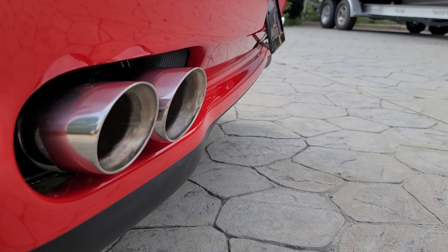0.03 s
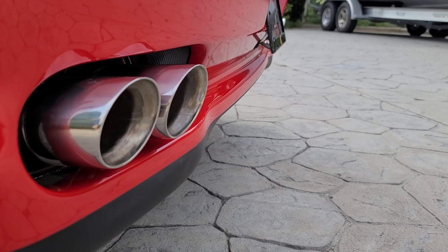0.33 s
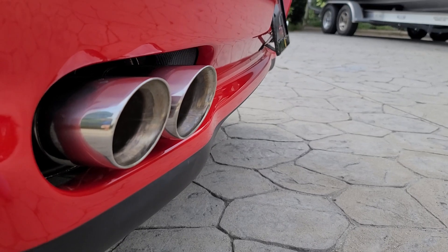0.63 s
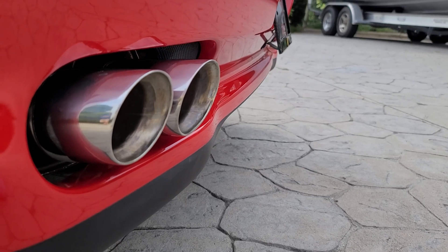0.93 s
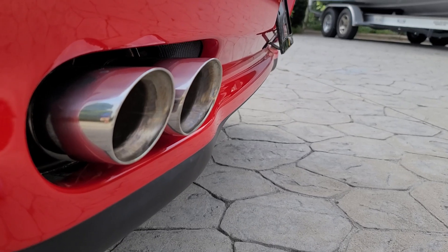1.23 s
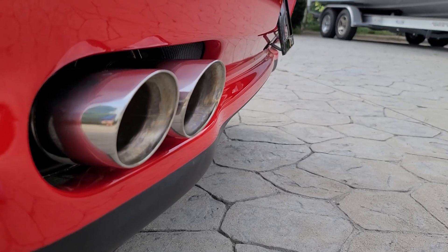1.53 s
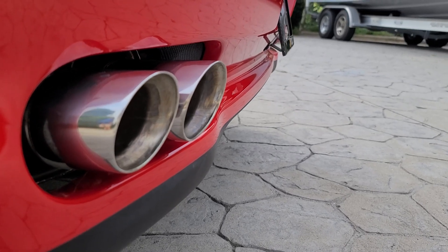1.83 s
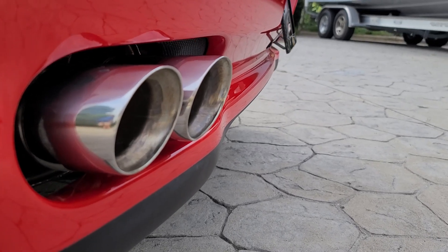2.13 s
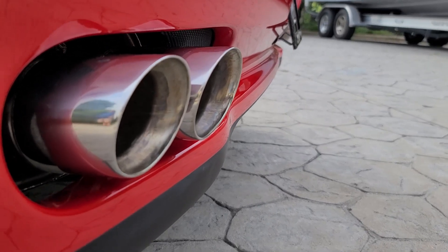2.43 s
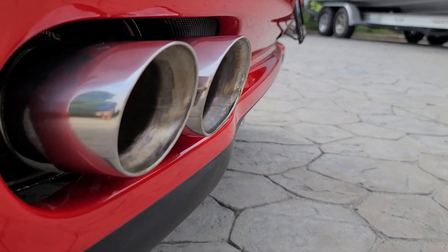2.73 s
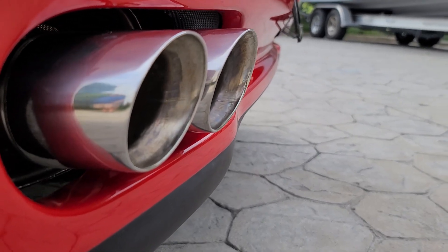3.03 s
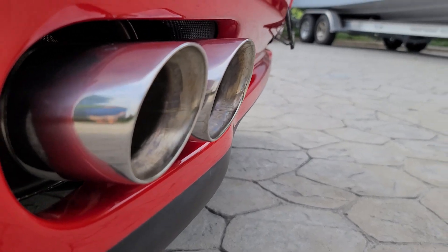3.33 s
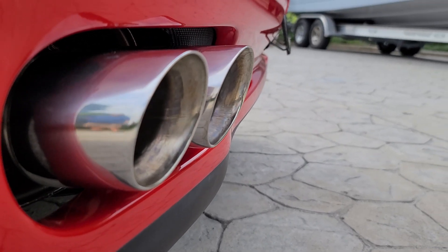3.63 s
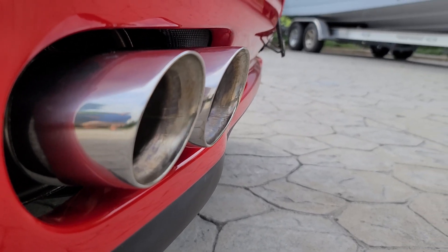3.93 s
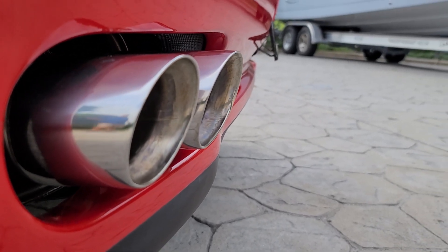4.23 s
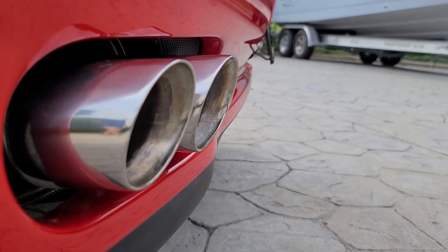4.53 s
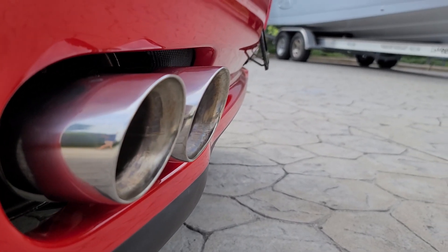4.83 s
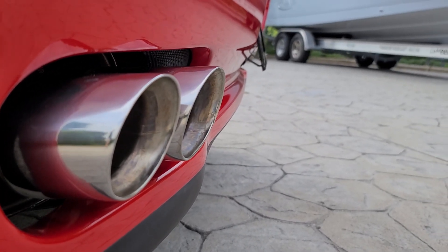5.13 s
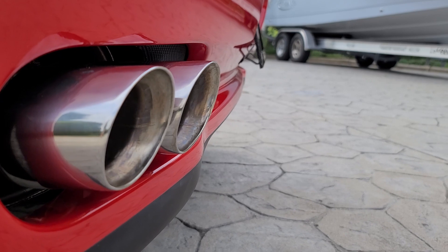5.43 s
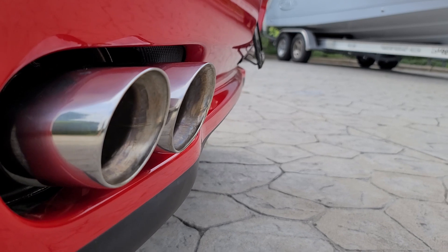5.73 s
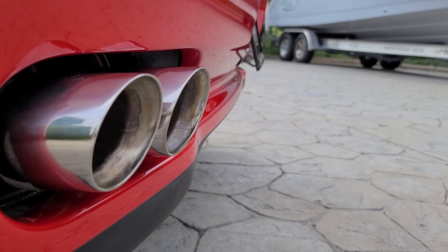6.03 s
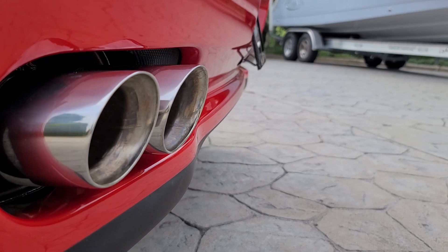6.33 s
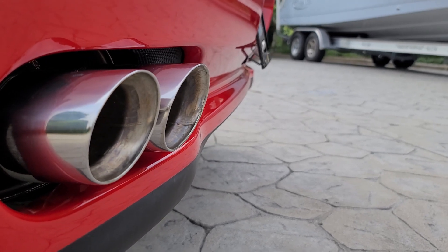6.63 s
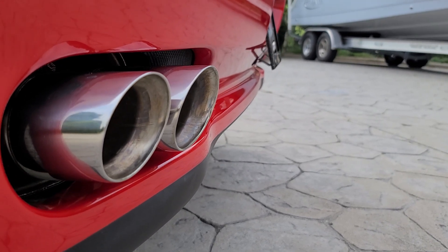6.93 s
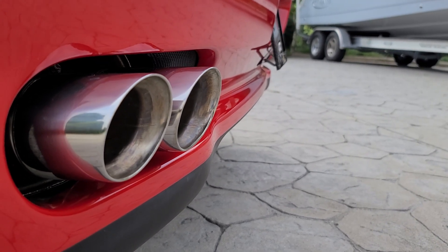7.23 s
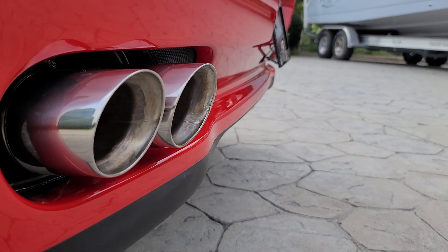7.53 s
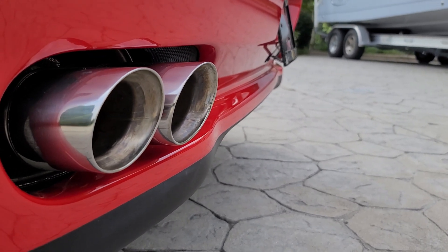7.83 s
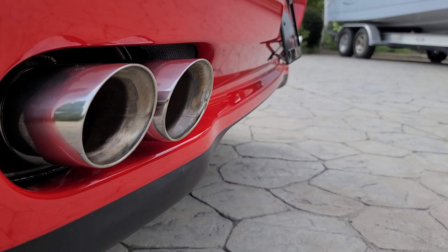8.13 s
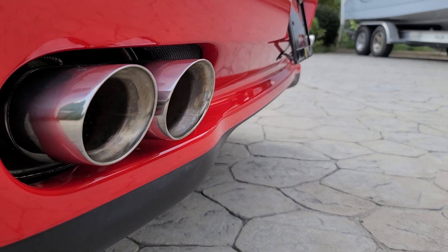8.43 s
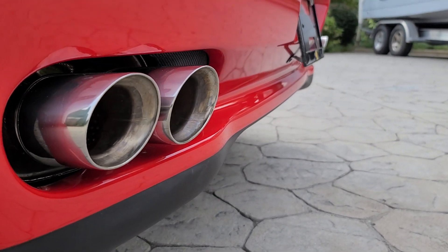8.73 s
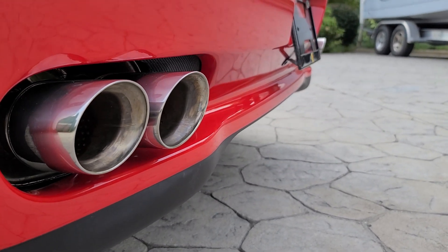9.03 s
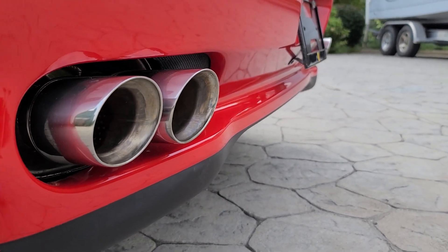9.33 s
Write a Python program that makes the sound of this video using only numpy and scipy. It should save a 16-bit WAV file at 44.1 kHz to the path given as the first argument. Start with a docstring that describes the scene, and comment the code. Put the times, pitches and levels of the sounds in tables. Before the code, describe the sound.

A sports car cold-starts outdoors, heard very close to its tailpipes. The starter engages with a metallic clash and grinds for about a second over low, uneven puffs. The engine catches with sharp cracks, flares up, then sinks with a few faint pops to a deep, steady idle with a raspy exhaust edge. A thin, faint pump whistle sits above it.

```python
"""Sports car cold start

A six-cylinder car on an open driveway, heard a hand's width from one pair of tailpipes. The starter grinds
and surges after each compression while the cylinders puff into the muffler. The engine catches with sharp
cracks, flares and sinks to idle. Each firing pumps the muffler, thumps and barks down the pipe and blows
gas, the near bank harder than the far one. A pump whistles thinly over a quiet outdoor rumble."""
import sys
import numpy as np
from scipy import signal
from scipy.fft import rfft, irfft
from scipy.io import wavfile
from scipy.ndimage import uniform_filter1d

SR = 44100
rng = np.random.default_rng(int(sys.argv[2]) if len(sys.argv) > 2 else 0)


def inscribe(sig):
    """Save sig as 16-bit PCM at rate SR to the path in sys.argv[1].

    A 1-D sig is mono; a 2-D sig holds one channel per row.
    Samples are clipped to [-1, 1] before scaling.
    """
    pcm = np.round(np.clip(np.atleast_2d(sig).T, -1, 1) * 32767)
    wavfile.write(sys.argv[1], SR, pcm.astype(np.int16))


N = 418509
T = np.arange(N) / SR

# engine speed through catch, flare and idle: (time [s], firing rate [Hz])
ENGINE_SPEED = [(1.134, 13.53), (1.33, 56.87), (1.49, 76.15), (1.73, 89.0), (1.97, 88.42), (2.24, 75.25),
                (2.58, 63.8), (2.9, 59.4), (3.37, 62.42), (3.83, 61.34), (4.19, 56.71), (4.64, 61.27),
                (5.15, 60.09), (6.08, 61.24), (6.79, 60.4), (7.84, 61.85), (9.49, 60.98)]
# how hard the engine pulls, which makes the gas turbulent: (time [s], load [0-1])
ENGINE_LOAD = [(1.15, 0.9), (1.24, 1), (1.49, 0.74), (1.6, 0.33), (1.85, 0), (2.2, 0)]
# compressions while cranking: (time [s], speed surge [share], puff level [dB], puff t60 [s])
COMPRESSIONS = [(.205, 0, -11, .15), (.255, 0.18, -15, 0.2), (0.367, 0.022, -2, 0.6),
                (0.489, .15, 0, 0.091), (.578, .06, 3, 0.21), (.668, 0.17, -21, 0.26),
                (.75, 0.081, -11, 0.41), (.838, .17, -26, .1), (.912, 0.049, -5, 0.23),
                (.995, .1, -17, 0.45), (1.067, 0, -8, 0.86)]
# cross resonances of the tailpipe: (frequency [Hz], width [Hz], gain [dB])
TAILPIPE_MODES = [(1062, 45, 8.5), (1355, 40, 6.5), (1736, 70, 2.5), (2204, 70, 1.5)]
# resonances of the starter housing: (frequency [Hz], width [Hz], gain [dB])
HOUSING_MODES = [(595, 17, -2), (931, 66, 1.5), (1328, 30, 1), (1692, 17, 4), (2040, 59, -3.5),
                 (2210, 23, -3.5), (2553, 87, -11.5), (2660, 38, -6.5), (3250, 94, -41)]
# bright hiss of the exhaust jet: (frequency [Hz], gain [dB])
HISS_EQ = [(1500, -24.5), (3300, -5), (4200, -6), (5400, -1), (6300, -3.5), (7500, -7), (10000, -12),
           (12500, -3.5), (15000, -1)]
# sizzling top end of the starter: (frequency [Hz], gain [dB])
SIZZLE_EQ = [(2350, -20), (4000, -11), (4560, -3), (5560, -2), (6850, -7.5), (11200, -9.5), (15500, -13.5)]

STARTER_ON_S, STARTER_OFF_S = 0.172, 1.042
MERGE_S = 1.335  # from here the firings merge into one steady boom
WARM_FROM_S, WARM_BY_S = 4.94, 8.3


def undb(db):
    """Decibels to gain."""
    return np.exp(np.asarray(db) * np.log(10) / 20)


def curves(table, at=T):
    """The columns of a table, interpolated along its first one."""
    axis, *columns = np.transpose(table)
    return [np.interp(at, axis, column) for column in columns]


def ramp(start, end):
    """Fade from 0 to 1 between two times."""
    return np.interp(T, [start, end], [0, 1])


def unit(x):
    """Scale to rms 1."""
    return x / np.sqrt(np.mean(x ** 2))


def colour(x, points, size=4096):
    """Minimum-phase EQ through (frequency [Hz], gain [dB]) points."""
    hz, db = np.transpose(points)
    bin_hz = np.arange(size // 2 + 1) * SR / size + 1
    log_gain = np.log(undb(np.interp(np.log(bin_hz), np.log(hz), db)))
    cepstrum = irfft(log_gain)
    cepstrum[1:size // 2] *= 2
    cepstrum[size // 2 + 1:] = 0
    response = irfft(np.exp(rfft(cepstrum)))
    return signal.oaconvolve(np.atleast_2d(x), response[None], axes=1)[:, :N]


def resonate(x, modes):
    """Parallel resonators: (frequency [Hz], width [Hz], gain [dB])."""
    return sum(undb(db) * signal.lfilter(*signal.iirpeak(hz, hz / width, fs=SR), x)
               for hz, width, db in modes)


def wander(rate_hz):
    """Smooth random modulation, rms 1."""
    hold = int(SR / rate_hz)
    steps = np.repeat(rng.standard_normal(N // hold + 1), hold)
    return unit(uniform_filter1d(steps, hold)[:N])


def stereo(x, lag_ms):
    """Sound reaches the left microphone first."""
    x = np.ravel(x)
    return np.array([x, np.interp(T - lag_ms / 1000, T, x)])


def turbulence(shared, lag_ms):
    """White noise with a share of its power common to both microphones."""
    common = stereo(rng.standard_normal(N), lag_ms)
    return np.sqrt(shared) * common + np.sqrt(1 - shared) * rng.standard_normal((2, N))


def strikes(times, sizes):
    """One impulse for each time."""
    return np.bincount(np.clip(times * SR, 0, N - 1).astype(int), sizes, N)


def swell(impulses, peak_s):
    """Each impulse becomes an envelope that peaks after peak_s and dies away."""
    age = np.arange(SR // 8) / SR / peak_s
    return signal.oaconvolve(impulses, age * np.exp(1 - age))[:N]


def firings():
    """Firing rate, running count of firings, the sample of each one and its bank (1 = far)."""
    hz, = curves(ENGINE_SPEED)
    phase = np.cumsum(hz * (T >= ENGINE_SPEED[0][0])) / SR
    number = np.arange(int(phase[-1]))
    return hz, phase, np.searchsorted(phase, number, side="right"), number % 2


def engine(thump_delay_s=0.001, gas_lead_s=0.00029, far_delay_s=0.00068):
    """The two banks fire in turn; speed, load and pipe warmth ride the level of every exhaust layer."""
    # base exhaust mix: (firing rate [Hz], boom [dB], thump [dB], bark [dB], rasp [dB], hiss [dB])
    mix_by_speed = [(59, -13.5, -18, -29.5, -41, -55.5), (59.35, -11, -17.5, -30.5, -40, -53.5),
                    (62.6, -11, -18.5, -26, -44, -53.5), (65.6, -13, -15, -25, -43, -57),
                    (76.2, -11, -27, -28, -40.5, -56), (88.7, -8, -24, -29, -36.5, -51)]
    # added at full load: (boom [dB], thump [dB], bark [dB], rasp [dB], hiss [dB])
    load_boost = (.5, 5.5, 7.8, 10, 12)
    # added by a warm pipe: (boom [dB], thump [dB], bark [dB], rasp [dB], hiss [dB])
    warm_boost = (-0.9, 2.5, -1, 4.5, 4.5)
    # strength of each cylinder in firing order, near bank first: (gain [dB])
    cylinder_db = [1.4, -1.2, -1.4, -0.65, 0.46, -0.13]
    # the far bank's thump against the near bank's: (time [s], gain [dB])
    far_thump = [(1.1, -5.5), (1.6, -11), (2.1, 1), (2.45, -12.5), (3, -20.5), (9.4, -10)]
    # turbulent flow through the muffler: (frequency [Hz], gain [dB])
    flow_eq = [(20, -18), (45, -9.5), (72, 1), (100, -9), (150, -11.5), (240, -9.5), (400, -29.5),
               (900, -56)]
    hz, phase, at, far = firings()
    far_db, = curves(far_thump)
    load, = curves(ENGINE_LOAD)
    warmth = ramp(WARM_FROM_S, WARM_BY_S)
    catch_s = ENGINE_SPEED[0][0]
    build_db = -20.5 * (1 - ramp(catch_s, catch_s + 0.11))  # the first firings are weak
    boom_db, thump_db, bark_db, rasp_db, hiss_db = (
        db + load_db * load + warm_db * warmth + build_db
        for db, load_db, warm_db in zip(curves(mix_by_speed, hz), load_boost, warm_boost))
    # cold combustion is uneven
    thump_jitter, burn_jitter, gust_jitter = rng.standard_normal((len(at), 3)).T
    per_firing = np.sqrt(np.mean(hz[at]) / hz[at])  # holds the power steady as firings crowd together
    thump_sizes = per_firing * undb(far * far_db[at] + 0.5 * thump_jitter)
    burn = per_firing * undb(np.resize(cylinder_db, len(at)) + 1.7 * np.tanh(burn_jitter))
    gusts = burn * undb(1.8 * np.tanh(gust_jitter))

    boom = -np.sqrt(2) * np.cos(2 * np.pi * phase) * ramp(MERGE_S - 0.025, MERGE_S + 0.025)
    flow = unit(colour(rng.standard_normal(N), flow_eq)) * undb(-20.5 + 18.8 * load)
    thump = pipe_thump(strikes(T[at] + thump_delay_s, thump_sizes))
    lows = (boom + flow) * undb(boom_db) + thump * undb(thump_db)
    exit_s = T[at] - gas_lead_s + far * far_delay_s  # the far bank's gas has further to go
    gas = swell(strikes(exit_s, gusts * undb(-4.5 * far)), peak_s=0.0022)
    highs = gas_rasp(gas) * undb(rasp_db - 0.5) + jet_hiss(exit_s, gusts, far) * undb(hiss_db)
    mids = pipe_bark(strikes(exit_s, burn * undb(-3.5 * far)), gas, load) * undb(bark_db)
    return (T >= catch_s) * (stereo(lows, lag_ms=0.19) + mids + highs)


def pipe_thump(impulses, low_cut_hz=85, size=4096):
    """Each impulse becomes a rounded pressure hump; the open pipe end radiates little of its sub-bass."""
    # spectrum of one hump: (frequency [Hz], gain [dB])
    thump_eq = [(20, -16.5), (31, 12.5), (60, -5.5), (90, 10.5), (122, 4), (152, 2), (183, -4.5),
                (214, -2.5), (245, -10.5), (280, -15), (400, -45.5), (900, -68)]
    hz, db = np.transpose(thump_eq)
    gain = undb(np.interp(np.log(np.linspace(1, SR / 2, size + 1)), np.log(hz), db))
    hump = np.roll(irfft(gain), size)
    humps = signal.oaconvolve(impulses, hump)[size:size + N]
    return unit(signal.sosfilt(signal.butter(2, low_cut_hz, "high", fs=SR, output="sos"), humps))


def pipe_bark(fronts, gas, load, echo_s=0.00741):
    """Pressure fronts ring the pipe and bounce once off the muffler; hot gas brightens the tone."""
    # voice of the cold pipe: (frequency [Hz], gain [dB])
    cold_eq = [(120, -40.5), (260, -24.5), (315, 1), (350, 2.5), (420, 8), (490, 1), (550, 1), (630, -4.5),
               (760, -13.5), (950, -24.5), (1300, -22.5), (2000, -60), (5000, -69.5)]
    # voice of the warm pipe, its resonances higher: (frequency [Hz], gain [dB])
    warm_eq = [(120, -51), (265, -9.5), (305, 2), (335, -5), (425, 1), (490, 2), (560, 1), (700, -6),
               (830, -18.5), (980, -24.5), (1350, -19), (2200, -57.5), (5000, -66.5)]
    echoed = unit(fronts + 0.082 * np.interp(T - echo_s, T, fronts))
    breath = undb(-6.5 + 7 * load) * unit(rng.standard_normal(N) * (gas + 0.6))
    drive = (echoed + breath) / undb(2.8 * load)
    heat = 0.69 * (1 - ramp(2.4, 2.7)) + ramp(WARM_FROM_S, WARM_BY_S)  # the flare, then the slow warm-up
    body = (1 - heat) * unit(colour(drive, cold_eq)) + heat * unit(colour(drive, warm_eq))
    ring = undb(-27) * unit(resonate(drive, TAILPIPE_MODES))
    return stereo(body, lag_ms=0.22) + stereo(ring, lag_ms=0.31)


def gas_rasp(gas):
    """Each puff of gas rasps through the tailpipe and rings its cross resonances."""
    # midrange grit of the gas: (frequency [Hz], gain [dB])
    rasp_eq = [(410, -27.5), (700, -1.5), (777, -4.5), (896, -8), (952, -20.5), (1040, -10), (1140, -12),
               (1350, -12.5), (1550, -26), (1750, -10.5), (2040, -21), (2290, -23), (2740, -36),
               (3640, -49), (4200, -51), (5460, -68.5), (9240, -120)]
    rasp = colour(turbulence(0.85, lag_ms=0.3) * (gas + 0.23), rasp_eq)
    return unit(rasp) + undb(-11.5) * unit(resonate(rasp, TAILPIPE_MODES))


def jet_hiss(exit_s, gusts, far, tick_delay_s=0.002):
    """The exhaust jet hisses in pulses; the near bank's are louder and carry a sharp tick."""
    jet = swell(strikes(exit_s, gusts * undb(-13 * far)), peak_s=0.0034)
    tick = swell(strikes(exit_s + tick_delay_s, gusts * (1 - far)), peak_s=0.001)
    envelope = np.sqrt(0.6 * jet ** 2 + 0.81 * tick ** 2 + 0.14)
    return unit(colour(turbulence(0.24, lag_ms=0.4) * envelope, HISS_EQ))


def muffler_puffs(muffler_hz=67.8, catch_hz=71, catch_db=7.5, lead_s=0.0017, rise_s=0.0085):
    """Single charges of gas ring the muffler: one per cranking stroke, then per firing until they merge."""
    _, _, at, _ = firings()
    cranked = [(s, db, muffler_hz, t60) for s, _, db, t60 in COMPRESSIONS]
    fired = [(s - lead_s, catch_db, catch_hz, 2.9 * gap)
             for s, gap in zip(T[at], np.diff(T[at])) if s < MERGE_S]
    puffs = np.zeros(N)
    age = T[:SR // 2]
    attack = 1 - np.exp(-(age / rise_s) ** 2)
    for s, db, hz, t60 in cranked + fired:
        ring = -np.sin(2 * np.pi * hz * age) * attack * undb(-60 * age / t60)
        start = int(s * SR)
        puffs[start:start + len(age)] += undb(db) * ring
    # air pumped through the muffler rumbles between the puffs
    pumping = ramp(0.16, 0.27) * (1 - ramp(STARTER_OFF_S, MERGE_S))
    airflow = resonate(rng.standard_normal(N), [(muffler_hz, 24, 0)])
    rumble = unit(resonate(airflow, [(muffler_hz, 40, 0)])) * undb(-25.5)
    return stereo(puffs + pumping * rumble, lag_ms=0.1)


def exhaust_cracks(lean_from_s=1.502, lead_s=0.001, far_boost_db=1, spit_db_per_hz=0.33):
    """The first rich charges leave the pipe as steep fronts with a spit of treble; stray pops follow."""
    # stray pops after the catch: (time [s], body level [dB], spit level [dB])
    pops = [(1.52, -39, -49), (1.5445, -17.5, -29), (2.365, -32, -52), (2.48, -33, -46), (2.604, -33, -56)]
    # body of a crack: (frequency [Hz], gain [dB])
    crack_eq = [(300, -2.5), (800, 5), (1400, -3.5), (2800, -18.5), (4500, -24.5), (15000, -52)]
    hz, _, at, far = firings()
    load, = curves(ENGINE_LOAD)
    rich = T[at] < lean_from_s
    at, far = at[rich], far[rich]
    body_db = -19 + far_boost_db * far - 10 * (1 - load[at])
    spit_db = body_db - 2.5 + spit_db_per_hz * (hz[at] - hz[at[-1]])  # brighter as the revs climb
    cracks = np.transpose([T[at] - lead_s, body_db, spit_db])
    times, body_db, spit_db = np.vstack([cracks, pops]).T
    body = unit(colour(turbulence(0.38, lag_ms=0.27), crack_eq))
    body *= swell(strikes(times, undb(body_db)), peak_s=0.0019)
    spit = unit(colour(turbulence(0.28, lag_ms=0.258), HISS_EQ))
    spit *= swell(strikes(times, undb(spit_db)), peak_s=0.00061)
    return body + spit


def starter(bite_db=22, teeth_per_groan=3.72, inrush_s=0.035, release_s=0.062):
    """Gear teeth rattle the housing over a brush whirr and a low groan, surging after each compression."""
    # cranking speed: (time [s], gear tooth rate [Hz])
    cranking = [(.18, 830), (.28, 908.4), (.42, 830.6), (.55, 919), (.72, 962), (.96, 1057), (1.06, 1240)]
    # partials of the gear whine: (multiple of the tooth rate [ratio], level [dB])
    gear_partials = [(1, -5), (1.27, -10.5), (2.001, -1.5), (3, -11)]
    # whirr of the brushes: (frequency [Hz], gain [dB])
    whirr_eq = [(210, -74), (350, -46), (577, -2), (689, -9.5), (776, 5.5), (874, -5), (1180, -7),
                (1680, -1), (2130, -6), (2370, -24), (3350, -2), (4560, -27), (6000, -44.5), (7800, -52),
                (13200, -120)]
    # resonance of the starter's mount: (frequency [Hz], width [Hz], gain [dB])
    mount_modes = [(285, 49, 0)]
    times, surge_sizes, _, _ = np.transpose(COMPRESSIONS)
    surge = swell(strikes(times, surge_sizes), peak_s=0.018)
    tooth_hz = curves(cranking)[0] * (1 + surge) * (1 + 0.015 * wander(500))
    tooth_phase = 2 * np.pi * np.cumsum(tooth_hz) / SR
    mesh = sum(undb(db) * np.sin(ratio * tooth_phase) for ratio, db in gear_partials)
    gears = 1.2 * resonate(mesh, HOUSING_MODES) + 0.6 * mesh
    gears *= undb(-4 + bite_db * surge + 3 * wander(320))
    chatter = undb(1.2 * wander(260))
    housing = unit(resonate(turbulence(0.4, lag_ms=0.505) * chatter, HOUSING_MODES))
    whirr = unit(colour(turbulence(0.16, lag_ms=0.54) * chatter, whirr_eq))
    sizzle = unit(colour(turbulence(0.18, lag_ms=0.52) * chatter, SIZZLE_EQ)) * undb(-45)
    grind = (stereo(gears, lag_ms=0.1) + 0.85 * housing + 0.7 * whirr) * undb(-27.5 + 9 * surge)
    groan = resonate(np.sin(tooth_phase / teeth_per_groan), mount_modes)
    groan *= undb(-35.5 + bite_db * surge + 5 * wander(30))
    # the motor is loudest as the current first rushes in
    inrush = undb(8.5 * np.exp(-np.maximum(T - STARTER_ON_S, 0) / inrush_s))
    # released, it drops back quickly and its brushes hiss on as it coasts
    driven = np.exp(-np.maximum(T - STARTER_OFF_S, 0) / release_s)
    coasting = 1 - ramp(STARTER_OFF_S, 2.06)
    motor = (grind + stereo(groan, lag_ms=0.32)) * np.maximum(driven, 0.21 * coasting)
    motor += sizzle * np.maximum(driven, 0.6 * coasting)
    return ramp(STARTER_ON_S, STARTER_ON_S + 0.017) * inrush * motor


def drive_knocks():
    """The starter drive gives a few dull knocks while cranking."""
    # hits on the drive: (time [s], level [dB])
    hits = [(.197, -14), (.822, -22), (.843, -17.5)]
    # resonances of the drive: (frequency [Hz], width [Hz], gain [dB])
    drive_modes = [(444, 110, 5), (610, 45, -2)]
    times, db = np.transpose(hits)
    knocks = resonate(strikes(times, undb(db)), drive_modes)
    knocks *= undb(db.max()) / np.abs(knocks).max()
    return stereo(knocks, lag_ms=0.36)


def pinion_clash():
    """The starter's pinion is thrown into the flywheel and its teeth clash for a moment."""
    ring = unit(resonate(turbulence(0.42, lag_ms=0.19), HOUSING_MODES))
    sizzle = undb(-6) * unit(colour(turbulence(0.24, lag_ms=0.13), SIZZLE_EQ))
    return (ring + sizzle) * undb(-24) * np.interp(T, [STARTER_ON_S, 0.185, 0.203, 0.235], [0, 1, 1, 0])


def pump_whistle(final_hz=7205, glide_hz=1180, spin_up_s=0.38):
    """A pump spins up to a thin whistle, and a narrow hiss sings along, loudest in the flare."""
    # fader of the whistle: (time [s], level [dB])
    fader = [(1.9, -74), (2.8, -53.5), (4.2, -55.5), (4.45, -60), (8, -61.5), (9.4, -70)]
    age = np.maximum(T - fader[0][0], 0)
    hz = final_hz - glide_hz * np.exp(-age / spin_up_s)
    db, = curves(fader)
    phase = 2 * np.pi * np.cumsum(hz * (1 + 0.0021 * wander(70))) / SR
    octave_db = np.interp(T, [2.1, 2.6, 2.8], [-80, -65, -80])
    tones = (np.sin(phase) * undb(db) + np.sin(2 * phase) * undb(octave_db)) * (age > 0)
    singing = unit(resonate(rng.standard_normal(N), [(3470, 70, 0)])) * undb(-60)
    singing *= np.interp(T, [1.7, 1.8, 2.8, 3.3], [0, 1, 0.8, 0.1])
    return stereo(tones * undb(1.9 * wander(25)) + singing, lag_ms=0.1)


def outdoors():
    """A quiet, steady bed of open-air rumble."""
    # tone of the ambience: (frequency [Hz], gain [dB])
    ambience_eq = [(18, -45), (30, -11.5), (69, -1.5), (253, -12.5), (337, -17.5), (1170, -18),
                   (2840, -27.5), (6200, -34), (9150, -38.5), (15000, -50.5)]
    return unit(colour(turbulence(0.61, lag_ms=0.12), ambience_eq)) * undb(-43.5)


def scene():
    """Over the outdoor bed, the car cranks, catches and settles to idle."""
    return (outdoors() + pinion_clash() + starter() + drive_knocks()
            + muffler_puffs() + exhaust_cracks() + engine() + pump_whistle())


def record(dry, ceiling=1.1, top_hz=15900):
    """The two microphones differ a little in colour; the highest peaks are rounded and the top is cut."""
    # the left microphone against the right: (frequency [Hz], gain [dB])
    left_tilt = [(60, .3), (125, -.4), (370, 1.8), (700, -.6), (2000, -.3), (4000, .4), (8000, -1.2),
                 (15000, -.5)]
    heard = np.vstack([colour(channel, [(hz, side * db / 2) for hz, db in left_tilt])
                       for channel, side in zip(dry, (1, -1))])
    rounded = heard / (1 + (heard / ceiling) ** 4) ** 0.25
    return signal.sosfilt(signal.ellip(10, 0.2, 80, top_hz, fs=SR, output="sos"), rounded)


dry = scene()
out = record(dry)
inscribe(out)
```